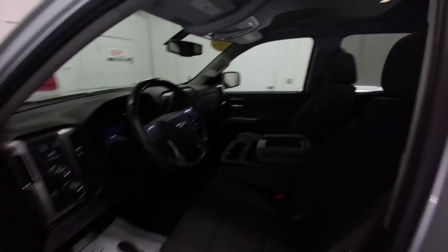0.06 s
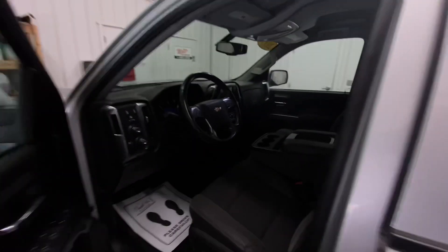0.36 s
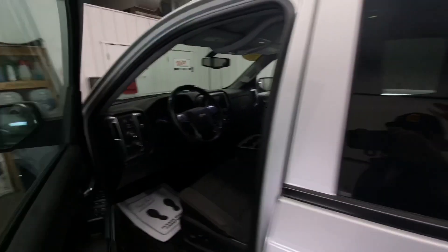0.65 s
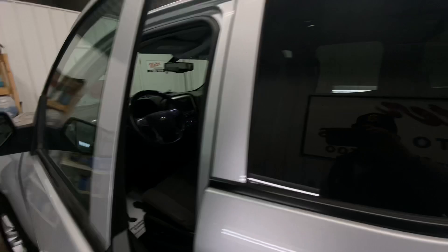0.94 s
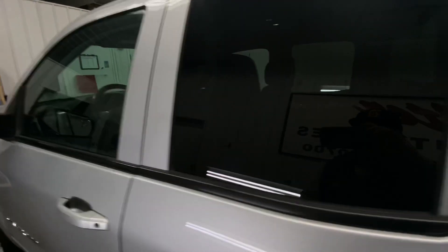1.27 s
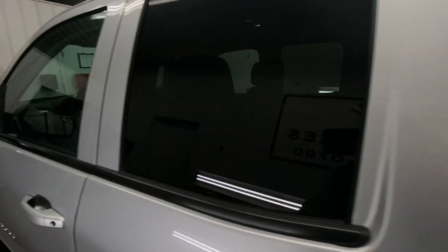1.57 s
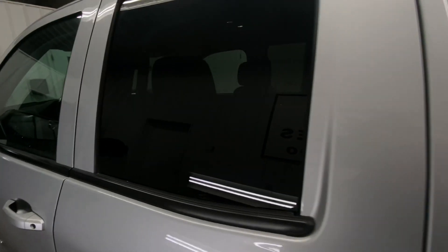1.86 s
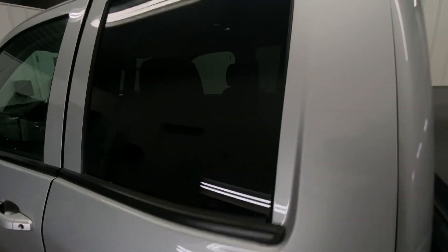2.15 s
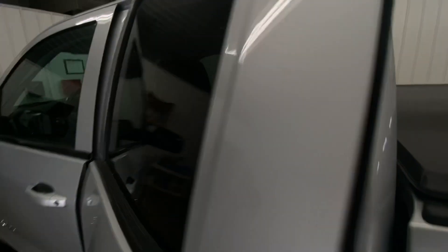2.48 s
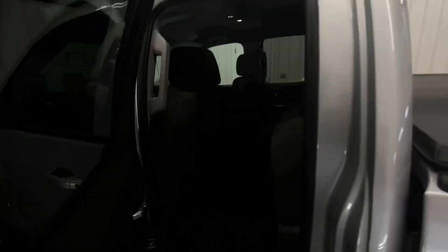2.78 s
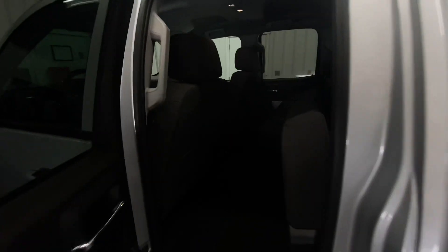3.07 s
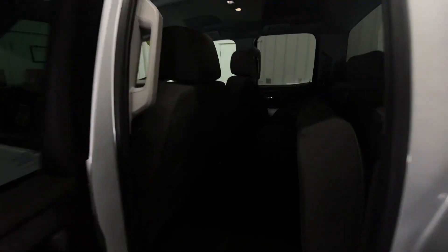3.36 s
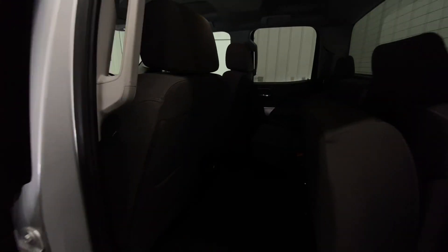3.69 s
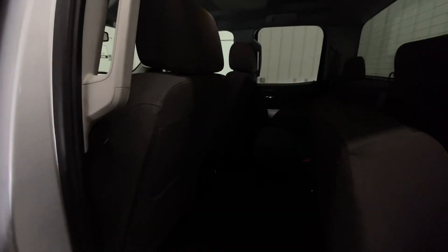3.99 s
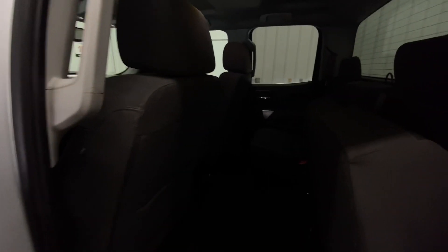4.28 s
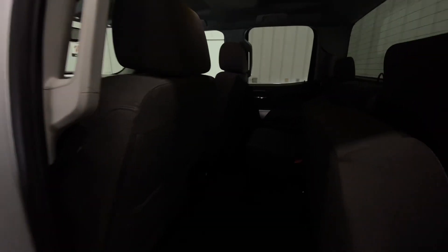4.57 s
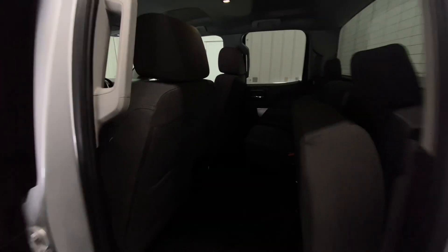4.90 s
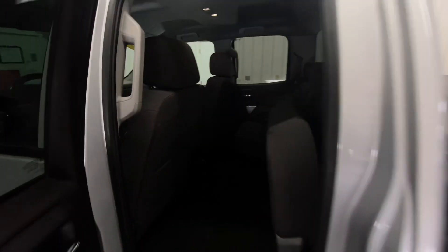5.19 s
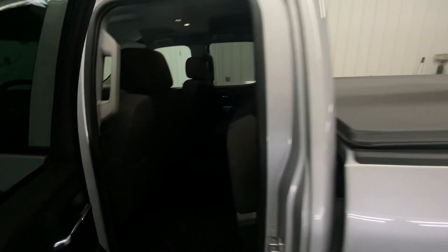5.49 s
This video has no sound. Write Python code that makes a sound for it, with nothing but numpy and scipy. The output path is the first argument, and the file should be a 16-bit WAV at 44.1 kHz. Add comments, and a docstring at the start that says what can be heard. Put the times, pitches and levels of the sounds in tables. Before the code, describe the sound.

A low electric hum and rumbling ventilation run throughout in a large workshop, the hum fading down over the first three seconds. Fingers knock lightly on the hand-held microphone at about 0.2 and 0.5 seconds, while a jacket rustles and a hinge scrapes faintly. At 1.2 seconds a pickup's front door slams, slightly to the right: the latch snaps, the metal panel booms and bounces once, and the hall rings for about a second. This is the loudest sound. Around 1.9 to 2.1 seconds the rear door unlatches with a clack and a softer thump. Small sharp ticks follow at 2.5 seconds, then soft puffs of air and faint dull bumps until 3 seconds. From there the ventilation turns slightly muffled, with scattered light finger taps and faint cloth rustle. One sharper close click comes at 4.6 seconds, and a short air puff at 5.5.

```python
"""Pickup doors in a workshop

A pickup's front door swings shut: the latch snaps, the metal panel booms and the large hall rings.
Then the rear door is unlatched and swung open, and a hand-held camera leans into the cab.
Electric hum and ventilation lie underneath; a jacket rustles and fingers knock on the camera."""
import sys
import numpy as np
from scipy import signal
from scipy.fft import rfft, irfft
from scipy.io import wavfile
from scipy.ndimage import uniform_filter1d

SR = 44100
rng = np.random.default_rng(int(sys.argv[2]) if len(sys.argv) > 2 else 0)


def generate_wav(signal):
    """Clip the signal to [-1, 1] and save it as 16-bit WAV at the path in sys.argv[1]."""
    frames = np.transpose(np.atleast_2d(signal))
    scaled = np.clip(frames, -1, 1) * 32767
    pcm = np.round(scaled).astype(np.int16)
    wavfile.write(sys.argv[1], SR, pcm)


N = 244314
LEFT_DELAY_S = 0.00054   # the doors are on the right, so their sound reaches the left side late


def from_db(db):
    """Turn decibels into a number to multiply by."""
    return 10 ** (np.asarray(db) / 20)


def unit_power(x):
    """Scale a sound to an average power of 1."""
    return x / np.sqrt(np.mean(x ** 2) + 1e-20)


def at_hz(points, hz):
    """Read between the rows of a table, giving each octave equal room."""
    known_hz, values = np.transpose(points)
    return np.interp(np.log(np.maximum(hz, 1)), np.log(known_hz), values)


def coloured(x, points, share=1, size=8192):
    """Turn each pitch up or down by a table of decibels."""
    gain = from_db(share * at_hz(points, np.fft.rfftfreq(size, 1 / SR)))
    # make the filter ring only after a sound, never before it
    cepstrum = irfft(np.log(gain))
    cepstrum[1:size // 2] *= 2
    cepstrum[size // 2 + 1:] = 0
    response = irfft(np.exp(rfft(cepstrum)))
    return signal.oaconvolve(np.atleast_2d(x), response[None], axes=1)[:, :x.shape[-1]]


def white_pair(length, alike):
    """Left and right hiss; the share they have in common arrives later on the left."""
    at = np.arange(length)
    draws = rng.standard_normal((3, length))
    late = np.interp(at - round(LEFT_DELAY_S * SR), at, draws[2])
    return np.sqrt(alike) * np.array([late, draws[2]]) + np.sqrt(1 - alike) * draws[:2]


def noise(points, alike=0, run_in=8192):
    """Steady stereo noise, coloured by a table."""
    return unit_power(coloured(white_pair(N + run_in, alike), points)[:, run_in:])


def dying(t, fade_s):
    """A fade that is 60 dB down after fade_s."""
    return np.exp(-np.log(1000) * t / fade_s)


def ring(t, hz, db, fade_s):
    """One fading tone of a struck object."""
    return from_db(db) * np.sin(2 * np.pi * hz * t) * dying(t, fade_s)


def add(track, start_s, sound):
    """Mix a sound into a track."""
    at = round(start_s * SR)
    track[:, at:at + sound.shape[-1]] += sound[:, :N - at]


def panned(x, left_db):
    """Tip a sound to the left, or to the right if left_db is negative."""
    return x * from_db([[left_db / 2], [-left_db / 2]])


def swells(rows, fall_s):
    """Loudness of soft strokes: each has its own rise, all fall away alike."""
    t = np.arange(N) / SR
    return sum(from_db(db) * np.exp(-((t - peak_s) / np.where(t < peak_s, rise_s, fall_s)) ** 2)
               for peak_s, rise_s, db in rows)


def clatter(hz, spread, rise_s, fade_s, alike, order):
    """A burst of tiny impacts: noise from hz / spread up to hz * spread."""
    t = np.arange(SR // 3) / SR
    band = signal.butter(order, [hz / spread, hz * spread], "band", fs=SR, output="sos")
    envelope = np.minimum(t / rise_s, 1) * dying(np.maximum(t - rise_s, 0), fade_s)
    burst = signal.sosfilt(band, white_pair(len(t), alike) * envelope)
    return burst * np.linalg.norm(envelope) / np.linalg.norm(burst, axis=1, keepdims=True)


def mains_hum(hum_hz=119.9, near_db=-40, far_db=-52.5, fade_db_per_s=4):
    """A hum at twice the mains frequency sinks to a steady level as the camera moves on."""
    t = np.arange(N) / SR
    # tones of the hum: pitch_multiple, level_db
    tones = [(1, 0), (2, -20), (3, -22), (5, -21)]
    hum = sum(from_db(db) * np.sin(2 * np.pi * multiple * hum_hz * t) for multiple, db in tones)
    return from_db(np.maximum(near_db - fade_db_per_s * t, far_db)) * unit_power(hum)


def ventilation(fan_hz=682.5, deepest_s=4.23, lean_s=1.18):
    """Rumble, moving air and a faint fan tone; the cab shields the camera as it leans in."""
    # colour of the rumble: pitch_hz, level_db
    rumble_colour = [(20, -5.5), (35, 1.5), (55, -0.5), (90, 1.5), (130, 3), (200, -1.5), (300, -8.5),
                     (420, -12.5), (560, -10.5), (690, -13), (780, -14.5), (950, -34.5), (1300, -36),
                     (3000, -52), (6500, -66), (14000, -87)]
    # colour of the moving air: pitch_hz, level_db
    air_colour = [(300, 7.5), (1000, -4), (1600, -1), (2400, -2.5), (3600, -1.5), (5000, -7), (6000, -6),
                  (7500, -18), (10000, -11.5), (12000, -25), (15000, -62)]
    t = np.arange(N) / SR
    inside = np.exp(-((t - deepest_s) / lean_s) ** 2)
    rumble = from_db(-39) * noise(rumble_colour)
    fan = from_db(-62) * unit_power(np.sin(2 * np.pi * fan_hz * t))
    air = from_db(-54.5) * noise(air_colour)
    return from_db(-1.5 * inside) * (rumble + fan) + from_db(-9.5 * inside) * air


def jacket(grain_db=1.5):
    """Cloth slides over cloth in short, slightly grainy strokes."""
    # sleeve strokes: peak_s, rise_s, level_db
    strokes = [(.02, 0.046, -54.5), (.14, 0.015, -46), (.52, 0.037, -47.5), (.69, 0.047, -46.5),
               (.97, 0.11, -50), (1.11, 0.038, -44), (1.55, 0.18, -66), (1.87, 0.34, -43.5),
               (2.29, 0.048, -52.5), (2.51, 0.035, -50.5), (2.75, .035, -45), (3.38, 0.018, -63.5),
               (4.43, 0.027, -65.5), (4.81, 0.021, -52.5), (5.135, 0.033, -54)]
    # colour of rubbing cloth: pitch_hz, level_db
    cloth_colour = [(500, 1), (1500, -7), (3000, 4), (4500, 5), (6000, 6.5), (7500, -1), (10000, 5.5),
                    (12000, -2), (14000, 1.5), (16000, -23)]
    grain = unit_power(uniform_filter1d(rng.standard_normal(N), size=200))
    return swells(strokes, fall_s=0.09) * from_db(grain_db * grain) * noise(cloth_colour, alike=0.1)


def finger_knocks(tap_hz=605, fingertip_hz=1800):
    """Soft fingertips set the camera shell ringing: firm knocks, and light taps as the grip shifts."""
    # firm knocks: start_s, level_db, pitch_hz
    firm = [(0.18, -32.5, 487), (0.506, -29, 630), (0.998, -40, 605), (2.535, -36, 474),
            (3.239, -39.5, 508), (3.284, -37, 607), (3.465, -39, 510), (3.606, -42, 567),
            (4.01, -40.5, 573), (4.239, -43, 582), (4.609, -29, 613), (5.379, -43, 520), (5.52, -39.5, 617)]
    # tones of the shell: pitch_multiple, level_db, fade_s
    shell_tones = [(1, 12.5, 0.048), (1.488, 4.5, 0.028)]
    light = [(rng.uniform(3.6, 5.1), -53 - 2.5 * rng.standard_normal(), tap_hz) for _ in range(4)]
    sides = np.array([[1], [-from_db(-11)]])   # on the right the wave is weaker and upside down
    out, t = np.zeros((2, N)), np.arange(SR // 8) / SR
    for start_s, db, hz in firm + light:
        shell = sum((-1) ** k * ring(t, multiple * hz, tone_db, fade_s)
                    for k, (multiple, tone_db, fade_s) in enumerate(shell_tones))
        add(out, start_s, from_db(db) * shell * sides)
    return signal.lfilter(*signal.butter(1, fingertip_hz, fs=SR), out)


def clacks(rows, rise_s, spread):
    """Parts of a hinge, latch or trim hit each other."""
    out = np.zeros((2, N))
    for start_s, db, hz, fade_s in rows:
        add(out, start_s, from_db(db) * clatter(hz, spread, rise_s, fade_s, alike=0.14, order=3))
    return out


def hall(x, build_s=0.0058, lowest_hz=32):
    """Dense echoes swell and then die away, each octave at its own rate."""
    # how long the hall rings: pitch_hz, fade_s
    fades = [(60, 0.07), (150, 0.3), (300, 1.31), (600, 0.72), (1300, 0.94), (2700, 1.18), (5000, 0.53),
             (10000, 0.76)]
    # colour of the echoes: pitch_hz, level_db
    echo_colour = [(30, 13), (80, 14.5), (300, -2.5), (700, -1), (1500, -1.5), (3000, -4), (6000, 2),
                   (14000, -7)]
    t = np.arange(3 * SR // 2) / SR
    octave = np.log2(np.maximum(np.fft.rfftfreq(len(t), 1 / SR), lowest_hz) / lowest_hz)
    white, tail = rfft(white_pair(len(t), alike=0.05)), 0
    for k in range(10):
        band = irfft(white * np.maximum(1 - abs(octave - k), 0), len(t))
        tail = tail + band * dying(t, at_hz(fades, lowest_hz * 2 ** k))
    swell = 1 - np.exp(-(t / build_s) ** 2)
    tail = tail * swell / np.linalg.norm(swell * dying(t, 1.0))
    return coloured(signal.fftconvolve(x, tail, axes=1)[:, :N], echo_colour)


def hinge_scrape():
    """The front hinge scrapes as the door swings."""
    # scrapes: peak_s, rise_s, level_db
    scrapes = [(.69, 0.031, -50), (1.02, 0.058, -54), (1.18, .06, -49.5)]
    # colour of the hinge: pitch_hz, level_db
    hinge_colour = [(700, -25), (1700, -6), (3800, -4), (7000, -32)]
    return swells(scrapes, fall_s=0.074) * noise(hinge_colour)


def striker(start_s=1.1925):
    """The front latch hits the steel loop it hooks onto, which pings."""
    # tones of the loop: pitch_hz, level_db, fade_s
    tones = [(2380, -41, 0.068), (2600, -36, 0.2), (3870, -18.5, 0.029), (3870, -31, 0.017),
             (5800, -35, 0.049)]
    out, t = np.zeros((2, N)), np.arange(SR // 3) / SR
    heard_s = np.maximum(t - np.array([[LEFT_DELAY_S], [0]]), 0)
    add(out, start_s, sum(ring(heard_s, *tone) for tone in tones))
    return out


def door(blows, panel_tones, rattle_db, left_delay_s):
    """Each blow rings the door panel and shakes the trim; the soft seal dulls both."""
    # colour of rattling sheet metal and trim: pitch_hz, level_db
    rattle_colour = [(25, -23), (50, -23.5), (120, 13), (250, 7.5), (500, 5), (800, -0.5), (1300, -12.5),
                     (2500, -1), (5000, -12), (7500, -10), (10000, -0.5), (15000, -16)]
    out, t = np.zeros((2, N)), np.arange(SR) / SR
    heard_s = np.maximum(t - np.array([[left_delay_s], [0]]), 0)
    boom = -sum(ring(heard_s, *tone) for tone in panel_tones)
    trim = from_db(rattle_db) * noise(rattle_colour, alike=0.35)
    for k, (start_s, db, brightness_hz, fade_s) in enumerate(blows):
        rattle = trim[:, k * SR // 2:][:, :SR] * dying(t, fade_s)
        seal = signal.butter(1, brightness_hz, fs=SR)
        add(out, start_s, from_db(db) * signal.lfilter(*seal, boom + rattle))
    return out


def front_door():
    """The front door meets its seal, slams and bounces back."""
    # blows on the door: start_s, level_db, brightness_hz, rattle_fade_s
    blows = [(1.1955, -22.5, 2000, 0.042), (1.2158, -16.5, 1970, 0.14), (1.2225, -10, 550, 0.067),
             (1.258, -15, 430, 0.3), (1.377, -25.5, 653, 0.11)]
    # tones of the panel: pitch_hz, level_db, fade_s
    tones = [(64, -9.5, 0.64), (89.3, -8, 0.46), (107, -5, 0.18), (166.3, -10.5, 0.26), (246.2, -16, 0.84),
             (302.7, -7.5, 0.27), (381.4, -1, 0.13), (469, -14, 0.16), (552, -18, 0.37), (633, 2, 0.093),
             (666, -25, 0.28), (960, -67, 0.079), (1200, -84, 0.14), (1383, -4, 0.28), (1440, -16, 0.26),
             (1800, -50, 0.46), (2200, -23, 0.31), (2600, -15, 0.21), (2996, -35, 1), (3880, -4, 0.2)]
    return panned(door(blows, tones, rattle_db=7.0, left_delay_s=0.00037), left_db=-2.5)


def ticks():
    """Small hard parts tick close to the microphone."""
    # sharp ticks: start_s, level_db, pitch_hz, half_width_octaves, left_db
    hits = [(1.375, -42, 6000, .6, 0), (2.0141, -27, 6200, .7, 3), (2.526, -31, 5800, 0.14, 1),
            (2.553, -33.5, 5640, 0.11, 6), (3.416, -44, 9000, 0.54, -5), (3.837, -54, 7000, .8, 1),
            (4.6077, -31.5, 7950, 0.42, 8.5), (4.608, -27, 1690, 0.96, 12.5), (4.609, -18.5, 760, 0.21, 9)]
    out = np.zeros((2, N))
    for start_s, db, hz, octaves, left_db in hits:
        tick = clatter(hz, spread=2 ** octaves, rise_s=0.00045, fade_s=0.0076, alike=0, order=2)
        add(out, start_s, from_db(db) * panned(tick, left_db))
    return out


def rear_door():
    """The rear door is released and bumps past its hinge stops."""
    # blows on the door: start_s, level_db, brightness_hz, rattle_fade_s
    blows = [(1.882, -29.5, 417, 0.053), (1.925, -26.5, 247, 0.55), (1.9855, -14, 402, 0.067),
             (2.017, -21, 302, 0.32), (2.055, -30, 250, 0.27), (2.825, -35, 68.6, 0.083),
             (2.995, -36, 59.3, 0.094)]
    # tones of the panel: pitch_hz, level_db, fade_s
    tones = [(111.6, -6.5, 0.55), (174.5, -4.5, 0.23), (256.4, -10.5, 0.27), (289, -20, 0.3),
             (385, -15, 0.3)]
    return panned(door(blows, tones, rattle_db=3.5, left_delay_s=0.00018), left_db=-2.0)


def air_puffs():
    """Air pushes past the microphone as the rear door and the camera move."""
    # puffs: peak_s, rise_s, level_db
    puffs = [(2.74, 0.094, -31.5), (2.98, 0.12, -38), (5.52, 0.01, -29)]
    # colour of wind on the microphone: pitch_hz, level_db
    wind_colour = [(25, -46), (45, 1.5), (70, -3), (110, -10), (200, -14), (400, -21), (800, -52.5)]
    return swells(puffs, fall_s=0.078) * noise(wind_colour)


def scene():
    """Both doors in the hall, over the steady sounds and the small close noises."""
    # front hinge, latch and trim: start_s, level_db, pitch_hz, fade_s
    front_hits = [(0.466, -44.5, 2000, 0.14), (1.1913, -17, 3380, 0.029), (1.1949, -23.5, 1900, 0.13),
                  (1.2095, -19, 2500, 0.054), (1.2135, -39, 4850, 0.083), (1.2148, -17.5, 950, 0.011),
                  (1.246, -28.5, 3720, 0.027), (1.376, -22, 311, 0.096)]
    # rear hinge, latch and trim: start_s, level_db, pitch_hz, fade_s
    rear_hits = [(1.905, -32.5, 2050, 0.17), (1.9745, -24, 2150, 0.031), (1.9755, -19.5, 2185, 0.05),
                 (2.003, -28.5, 2210, 0.047), (2.525, -41, 2020, 0.19)]
    front = front_door() + striker()
    rear = rear_door()
    front_clacks = clacks(front_hits, rise_s=0.0018, spread=1.46)
    rear_clacks = clacks(rear_hits, rise_s=0.0035, spread=1.434)
    echoes = hall(from_db(-9) * front + from_db(-4) * rear
                  + from_db(1) * front_clacks + from_db(-10.5) * rear_clacks)
    close = finger_knocks() + ticks() + hinge_scrape() + air_puffs() + jacket()
    return front + rear + front_clacks + rear_clacks + echoes + mains_hum() + ventilation() + close


def record(dry, cutoff_hz=15700):
    """The stereo sound is hollow and wide near 800 Hz, where left and right partly cancel."""
    # colour of what both sides share: pitch_hz, level_db
    mid_colour = [(22, -48), (45, 2), (690, 1), (750, -16.5), (900, 0), (1080, 5.5), (2000, -1),
                  (10800, -7.5), (12300, -26), (13500, -7)]
    # colour of left minus right: pitch_hz, level_db
    side_colour = [(22, -22), (45, 5.5), (130, -8), (300, -4.5), (500, -1), (800, 6), (1200, 4.5),
                   (2000, -1), (10800, -9.5), (12300, -7), (13500, -14)]
    # how much louder the left side is: pitch_hz, left_db
    balance = [(50, 0), (140, -3), (300, -1.5), (550, 2), (800, 2), (1200, -1.5), (4000, 0)]
    mid = coloured((dry[0] + dry[1]) / 2, mid_colour)
    side = coloured((dry[0] - dry[1]) / 2, side_colour)
    left = coloured(mid + side, balance, share=0.5)
    right = coloured(mid - side, balance, share=-0.5)
    rounded_peaks = np.tanh(np.vstack([left, right]))
    treble_cut = signal.ellip(10, 0.1, 80, cutoff_hz, fs=SR, output="sos")
    return signal.sosfilt(treble_cut, rounded_peaks)


dry = scene()
out = record(dry)
generate_wav(out)
```